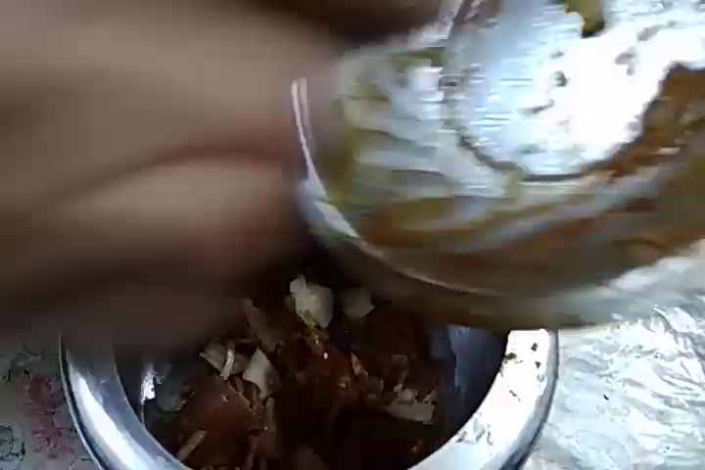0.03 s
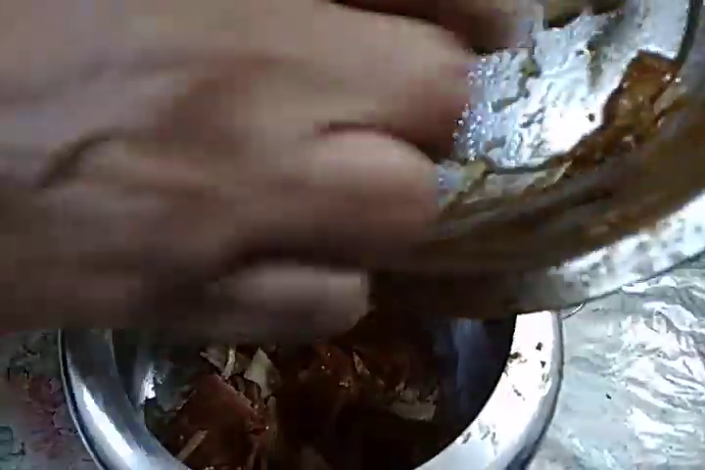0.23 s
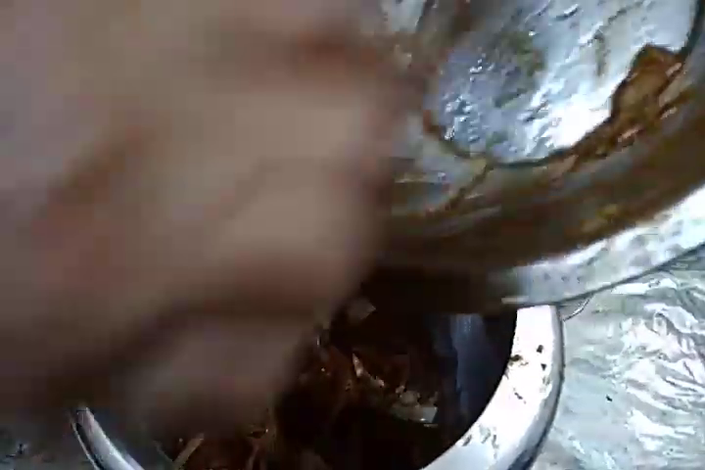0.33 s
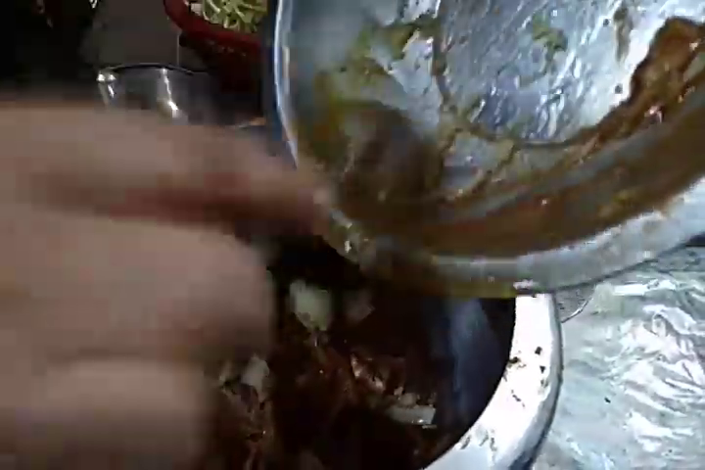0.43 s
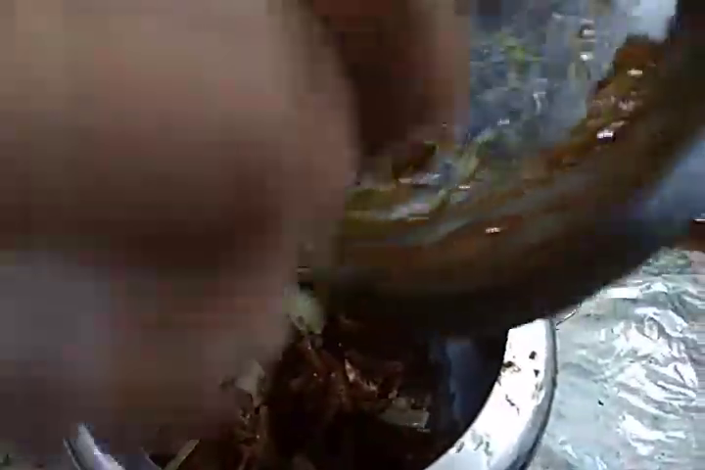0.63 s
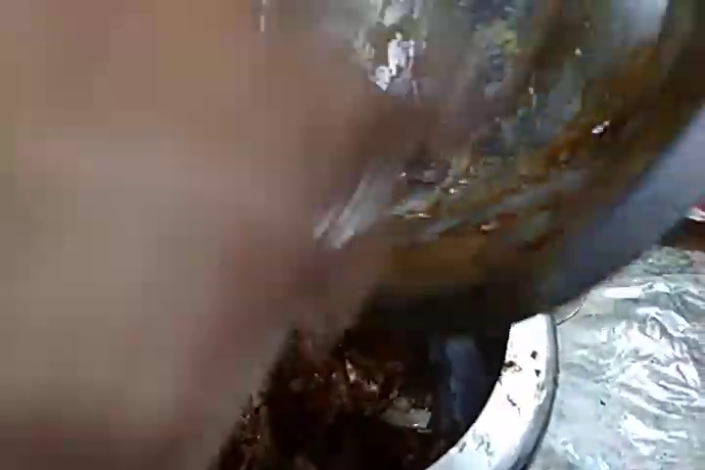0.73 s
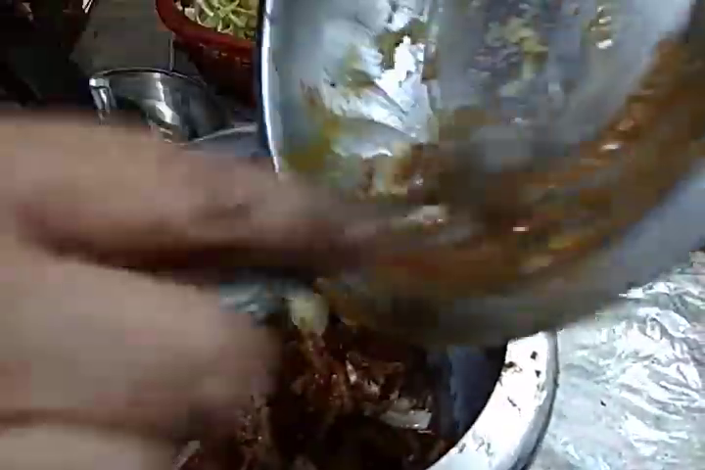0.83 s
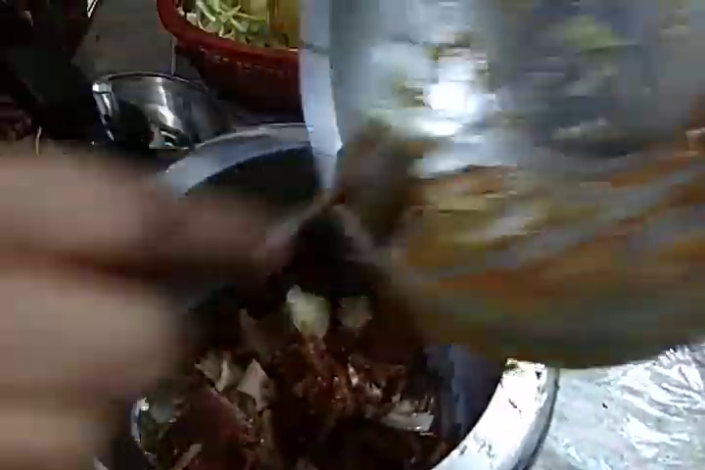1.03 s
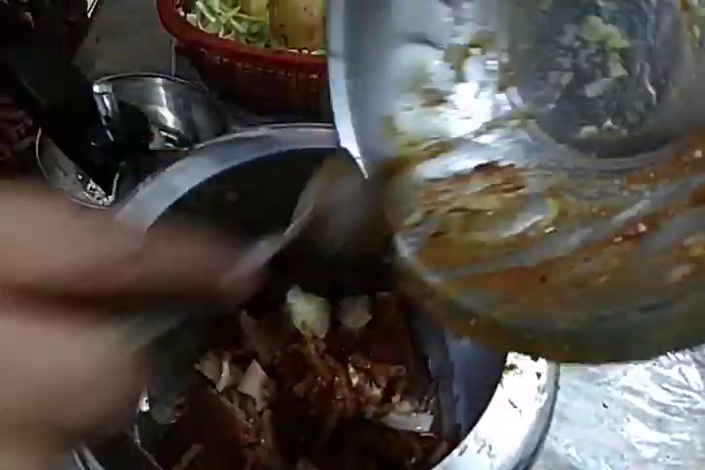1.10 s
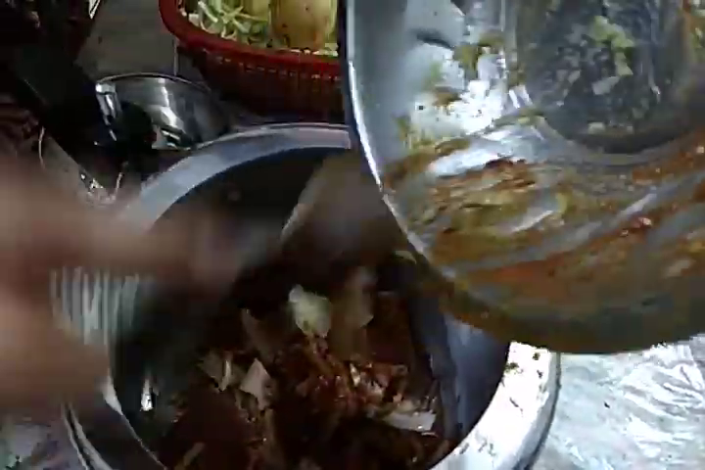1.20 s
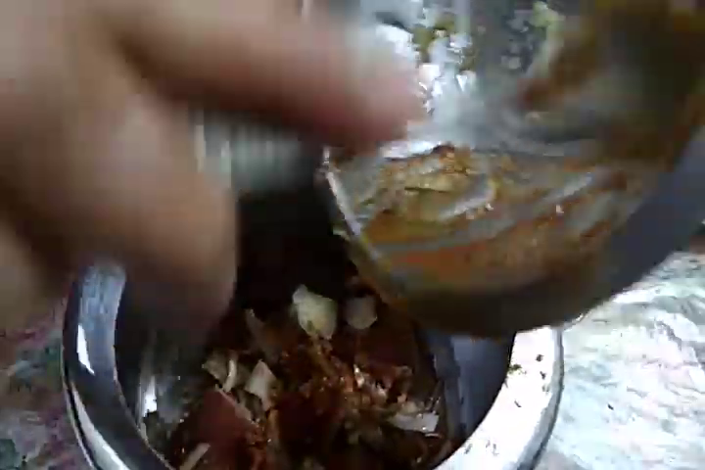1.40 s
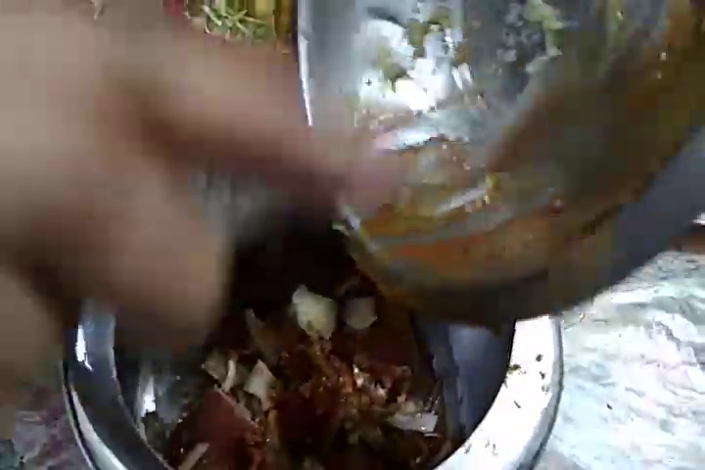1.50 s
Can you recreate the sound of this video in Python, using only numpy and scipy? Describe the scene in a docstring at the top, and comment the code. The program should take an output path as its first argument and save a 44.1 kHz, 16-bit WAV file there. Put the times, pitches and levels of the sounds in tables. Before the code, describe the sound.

A spoon scrapes thick paste from a steel bowl in three strokes, each a dull knock, a clang and a rasp. The bowl bangs a pot once, and the last stroke is faint. Heard close in a small kitchen.

```python
"""In a small kitchen, a spoon scrapes thick paste out of a hand-held steel bowl over a steel pot.
Each of three strokes starts with a dull knock through the paste. A moment later metal meets metal
with a clang, then the spoon's edge grips and slips along the wall, making a rasp.
Once the bowl bangs on the pot, which rings and thumps the table.
The near walls add a short echo, over a faint hiss and a low rumble."""
import sys
import numpy as np
from scipy import signal
from scipy.fft import rfft, irfft
from scipy.io import wavfile
from scipy.ndimage import uniform_filter1d

SR = 44100
rng = np.random.default_rng(int(sys.argv[2]) if len(sys.argv) > 2 else 0)


def to_wav(s):
    """Save 16-bit WAV."""
    ch = np.atleast_2d(s).T  # columns
    pcm = np.round(np.clip(ch, -1, 1) * 32767)  # PCM
    wavfile.write(sys.argv[1], SR, pcm.astype(np.int16))


N = 68355
T = np.arange(N) / SR
FREQS = np.maximum(np.fft.rfftfreq(N, 1 / SR), 10)
SIDES = np.array([[1], [-1]])  # left, right
TOP_HZ, RING_PAN_DB = 15800, 9  # highest pitch; how much louder lingering metal is on the left
ATTACK_S, KNOCK_RISE_S = 0.0018, 0.00028
WAVER_PER_S, WAVER_DEPTH = 45, .4  # the moving bowl makes its tones flutter

# the bowl's clear tones: f/Hz, level struck on the wall/dB, level struck on the rim/dB, t60/s
# (t60 is the time a sound takes to fade by 60 dB)
BOWL_TONES = [(516, -8, -16, .15), (743, -1, 1, .15), (868, -2, 2, .16), (1031, -1, 0, .18),
              (1345, -4, -3, .2), (1620, -13, -10, .35), (2202, -2, 0, .4), (2470, 0, -20, .2),
              (2838, 0, -30, .22), (3130, -2, -7, .24), (3275, -1, -16, .16), (3420, -16, -6, .18),
              (3838, 0, -12, .21)]
# the bowl's low note, two close tones that beat against each other: f/Hz, level/dB, t60/s
LOW_NOTE = [(632, 0, .3), (652, -4, .15)]
# how each pitch leans to one side: f/Hz, left minus right/dB
BALANCE = [(250, 0.5), (650, 2.5), (1500, -1), (3000, 7), (6000, 4), (9000, 2), (12000, -5), (16000, 4.5)]


def rasp(bowl):
    """The spoon's edge grips and slips, shaking the steel; firm pressure makes it fuller and sing."""
    # how hard the spoon scrapes, one list a stroke: t/s, level/dB
    strokes = [
        [(.112, -28), (.15, -37.5), (.17, -46), (.181, -34.5), (.212, -43), (.238, -33.5), (.285, -41.5),
         (.32, -38.5), (.343, -85)],
        [(.632, -49.5), (.668, -39.5), (.686, -21.5), (.722, -36.5), (.77, -32), (.79, -44), (.93, -57.5),
         (.975, -55.5), (1.06, -54), (1.12, -76.5)],
        [(1.412, -57), (1.445, -60), (1.55, -57)],
    ]
    # the rasp's colour under a light touch: f/Hz, level/dB
    light_colour = [(300, -32.5), (650, -32.5), (1200, -9), (2800, -23), (4200, -4), (6000, -11.5),
                    (7600, -6.5), (10500, 6), (13500, -8)]
    # what firm pressure adds: f/Hz, level/dB
    firm_colour = [(450, -13), (1000, -17), (2000, -25.5), (3300, -16), (6000, -9), (16000, -32)]
    grips_per_s, scatter_db = 1100, 5
    judder_per_s, judder_db, firm_db = 79, 4, -41
    effort = sum(amp(np.interp(T, *np.array(stroke).T, left=-150, right=-150)) for stroke in strokes)
    firmness = np.minimum(effort / amp(firm_db), 1) ** 1.7
    catches = rng.random(N) < grips_per_s / SR
    grips = catches * amp(scatter_db * rng.standard_normal(N)) * rng.choice([-1, 1], N)
    grips = grips * amp(judder_db * wander(judder_per_s))
    force = (effort * grips / grips.std())[None]
    tick = unit_energy(noise() * fade(0.006))  # each grip gives a tick and a short ring
    short_ring = amp(-1.5) * unit_energy(bowl() * fade(0.052))
    shaken = through(force, unit_energy(tick + short_ring))
    rim_tones = [(hz, db, t60) for hz, _, db, t60 in BOWL_TONES]
    rim = through(force * firmness, unit_energy(ring(rim_tones)))
    flutter = 1 + WAVER_DEPTH * wander(WAVER_PER_S)
    low_note = effort * flutter * np.sin(2 * np.pi * LOW_NOTE[0][0] * T + wander(WAVER_PER_S))
    scrape = colour(shaken, light_colour) + colour(shaken * firmness, firm_colour)
    return scrape + amp(-12.5) * rim + amp(-6) * low_note


def clangs(bowl):
    """The spoon hits bare steel; each spot has its own colour."""
    # spoon hits: t/s, five band levels/dB, lingering ring/dB, clear tones/dB, place (0 wall, 1 rim)
    hits = [(0.0175, -83, -49.5, -54, -115, -69, -8.5, -77, 0),
            (0.1074, -37.5, -42, -34, -25, -19.5, -28, -66, 0),
            (.194, -31.5, -16, -19, -21, -22, -19.5, -31.5, 0),
            (0.6293, -34.5, -23, -33, -24, -34, -21, -70, 0.18),
            (.6925, -27, -19.5, -47, -20.5, -21, -25.5, -31, 0.54),
            (.968, -76.5, -93, -57, -36.5, -57, -17, -80.5, 1),
            (1.0158, -78.5, -64, -50.5, -31.5, -36, -30.5, -87.5, 0.42),
            (1.372, -54, -37.5, -70, -47.5, -65.5, -19, -80, 0.62),
            (1.5395, -61, -114, -51.5, -30, -27.5, -23.5, -90, 1)]
    # where those five bands lie: f/Hz
    band_hz = [700, 1400, 3000, 5000, 11000]
    out = 0
    for start, *bands, tail_db, tones_db, place in hits:
        points = [(200, bands[0] - 1.5), *zip(band_hz, bands), (TOP_HZ, bands[-1] - 6)]
        tones = [(hz, np.interp(place, [0, 1], [wall, rim]), t60) for hz, wall, rim, t60 in BOWL_TONES]
        out = out + delay(clash(bowl, points, tail_db) + amp(tones_db) * ring(tones), start)
    return out


def knocks():
    """Blows bend the bowl's wall to and fro and wake its low note. Most are softened by the paste; the one just
    after the bang comes from the bowl hitting the pot."""
    # dull knocks: t/s, level/dB, f/Hz, t60/s, low note level/dB
    blows = [(.1004, -21.5, 535, 0.031, -28.5), (.1855, -3, 656, 0.0071, -29), (.306, -50, 607, 0.093, -37),
             (.3418, -17, 603, 0.013, -41), (.3497, -21, 618.4, 0.14, -44),
             (.6225, -25.5, 607, 0.11, -37.5), (.685, -15, 706, 0.018, -27.5), (.765, -44, 608, 0.12, -34),
             (.958, -54, 660, 0.25, -47), (1.014, -45, 605, 0.092, -70), (1.364, -32.5, 503, 0.04, -46),
             (1.372, -34, 617, 0.098, -47)]
    low_note = ring(LOW_NOTE) * rise(0.01)
    t = np.maximum(T - 0.00025 * (1 + SIDES) / 2, 0)  # the left ear hears it slightly later
    out = 0
    for start, db, hz, t60, note_db in blows:
        bend = np.sin(2 * np.pi * hz * t) * fade(t60, t) * rise(KNOCK_RISE_S, t)
        out = out - delay(amp(db) * bend + amp(note_db) * low_note, start)
    return signal.sosfilt(signal.butter(2, 210, "high", fs=SR, output="sos"), out)


def bang():
    """The bowl hits the pot, which rings and thumps the table."""
    # the colour of the crash: f/Hz, level/dB
    crash_colour = [(250, -45), (1400, -22.5), (7600, -14), (10500, -7), (15000, -24)]
    crash = clash(thin_steel(), crash_colour, tail_db=-27) + pot()
    table = thump(hz=127, db=-28, t60=0.022) + thump(hz=187, db=-45, t60=0.29)
    return delay(crash, start=.35) + delay(table, start=.3415)


def pot(count=7):
    """The struck pot rings in groups of close tones that beat against each other."""
    # groups of tones: middle f/Hz, half-width/Hz, level/dB
    groups = [(1312, 57, -28), (1527, 51, -38), (1923, 160, -27), (3197, 90, -26), (3430, 70, -27.5),
              (3843, 120, -28.5), (4520, 77, -38.5), (4800, 64, -37.5), (5780, 340, -29.5),
              (6710, 110, -38), (9060, 450, -29.5), (10060, 200, -31.5), (10650, 110, -33),
              (11480, 170, -33)]
    out = 0
    for middle, width, db in groups:
        hz = middle + width * (2 * (np.arange(count) + rng.random(count)) / count - 1)
        angle = 2 * np.pi * hz[:, None] * T
        phase = 2 * np.pi * rng.random(count) + SIDES * rng.uniform(-1.1, 1, count)  # ears out of step
        waves = np.cos(phase) @ np.sin(angle) + np.sin(phase) @ np.cos(angle)
        out = out + amp(db + SIDES * level_at(middle, BALANCE) / 2) * waves * np.sqrt(2 / count)
    tail = amp(-12 + SIDES * RING_PAN_DB / 2) * fade(0.33)
    return out * rise(ATTACK_S) * (fade(0.098) + tail)  # most dies at once, a little rings on


def thump(hz, db, t60):
    """One low, fading tone of the bumped table, a little to the left."""
    return amp(db + SIDES * 1.9) * np.sin(2 * np.pi * hz * T) * fade(t60)


def clash(metal, points, tail_db):
    """Metal on metal: a sharp crack, then the steel rings on."""
    crack = metal() * fade(0.041, np.maximum(T - 0.00054, 0))
    tail = metal() * fade(0.33) * amp(tail_db + SIDES * RING_PAN_DB / 2)
    return colour((crack + tail) * rise(ATTACK_S), points)


def ring(tones):
    """The bowl's tones flutter and fade; higher ones reach the ears out of step and lean left."""
    out = 0
    for hz, db, t60 in tones:
        spread = min((hz / 1240) ** 2, 1)
        phase = 2 * np.pi * hz * T + spread * (rng.uniform(-np.pi, np.pi) + SIDES * rng.uniform(-1.3, 1))
        flutter = 1 + WAVER_DEPTH * wander(WAVER_PER_S)
        wave = flutter * np.sin(phase + WAVER_DEPTH * wander(WAVER_PER_S))
        out = out + amp(db + SIDES * spread * 3.5) * fade(t60) * wave
    return out * rise(KNOCK_RISE_S)


def thin_steel(count=320, group=4, width_hz=75):
    """Thin steel shakes with many tones at once; returns a function that sounds them afresh."""
    hz = TOP_HZ * (np.arange(count) + 1 + rng.random(count)) / count
    low = hz < 4200  # low tones are strongest near the bowl's clear ones, high ones vary in groups
    near = np.max([np.exp(-((hz - tone[0]) / width_hz) ** 2) for tone in BOWL_TONES], axis=0) + amp(-7)
    uneven = amp(7 * np.repeat(rng.uniform(-1.1, 1, count // group), group))
    parts = [part / np.sqrt(np.mean(part ** 2)) for part in (near[low], uneven[~low])]
    spectrum = np.zeros(len(FREQS))
    spectrum[(hz * N / SR).astype(int)] = np.concatenate(parts)

    def shake():
        x = irfft(spectrum * np.exp(2j * np.pi * rng.random((2, len(FREQS)))), N)
        return x / x.std()
    return shake


def wall_echo(sound):
    """The near walls throw the sound back as a short echo."""
    reflections = delay(noise() * fade(t60=0.4), start=0.0032)
    return amp(-11) * through(sound, unit_energy(reflections))


def kitchen():
    """Faint hiss and a low rumble that comes and goes."""
    # the colour of the hiss: f/Hz, level/dB
    hiss_colour = [(300, -75.5), (700, -87.5), (8000, -93), (16000, -89.5)]
    # the colour of the rumble: f/Hz, level/dB
    rumble_colour = [(20, -78.5), (47, -68), (70, -77), (120, -69.5), (1000, -105)]
    # how the rumble swells: t/s, level/dB
    rumble_swell = [(.1, -3), (.78, 1), (.9, 7), (1.06, 4), (1.12, 0)]
    swell = amp(np.interp(T, *np.array(rumble_swell).T) + SIDES * 2)
    return colour(noise(), hiss_colour) + colour(rng.standard_normal((1, N)), rumble_colour) * swell


def colour(x, points):
    """Set how strong each octave of a white sound is (its colour), leaning left or right by pitch."""
    db = level_at(FREQS, points, fall_db=11.5) + SIDES * level_at(FREQS, BALANCE) / 2
    gain = amp(db) * np.sqrt(SR / 2 / FREQS / np.log(2))
    cepstrum = irfft(np.log(gain), N)
    cepstrum[:, 1:] *= 2 * (np.arange(1, N) < N // 2)  # keeps the filter from ringing before a hit
    response = irfft(np.exp(rfft(cepstrum)), N)
    return through(x, response[:, :SR // 20])


def level_at(hz, points, fall_db=0):
    """Read a level between (f/Hz, level/dB) points, losing fall_db per octave below the first."""
    f, db = np.array(points).T
    return np.interp(np.log(hz), np.log(f), db) - fall_db * np.maximum(np.log2(f[0] / hz), 0)


def amp(db):
    """Turn decibels into a multiplier."""
    return 10 ** (np.asarray(db) / 20)


def rise(seconds, t=T):
    """Climb smoothly from 0 towards 1."""
    return 1 - np.exp(-t / seconds)


def fade(t60, t=T):
    """Die away by 60 dB every t60 seconds."""
    return np.exp(-np.log(1000) * t / t60)


def delay(x, start):
    """Begin a sound at start seconds."""
    return np.pad(x, ((0, 0), (max(int(start * SR), 0), 0)))[:, :N]


def through(x, response):
    """Play a sound through something, given how that thing answers one click."""
    return signal.fftconvolve(x, response, axes=-1)[:, :N]


def unit_energy(x):
    """Scale a stereo sound to an average energy of 1 per side."""
    return x / np.sqrt(np.sum(x ** 2) / 2)


def noise():
    """White noise, partly shared by left and right."""
    return (rng.standard_normal((2, N)) + rng.standard_normal(N) / 2) / np.sqrt(1 + .5 ** 2)


def wander(per_s):
    """Smooth random motion with a spread near 1."""
    steps = rng.standard_normal(512)[(T * per_s).astype(int) % 512]
    return 1.2 * uniform_filter1d(steps, int(SR / per_s))


def scene():
    """Spoon, bowl and pot, with their echo and the kitchen behind them."""
    bowl = thin_steel()
    direct = knocks() + clangs(bowl) + bang() + rasp(bowl)
    return direct + wall_echo(direct) + kitchen()


def record(dry):
    """Round off the loudest peaks and cut the highest treble."""
    ceiling = 0.44
    rounded = ceiling * np.tanh(dry / ceiling)
    return signal.sosfilt(signal.ellip(10, .2, 80, TOP_HZ, fs=SR, output="sos"), rounded)


dry = scene()
out = record(dry)
to_wav(out)
```